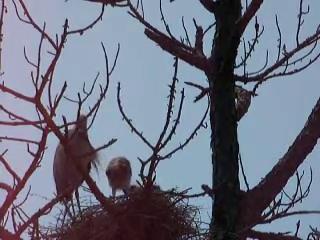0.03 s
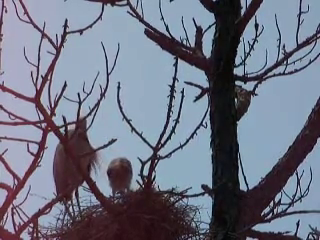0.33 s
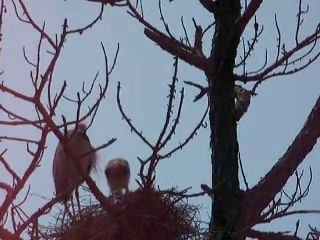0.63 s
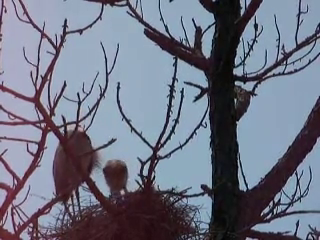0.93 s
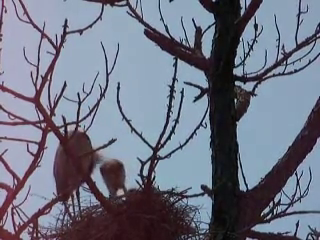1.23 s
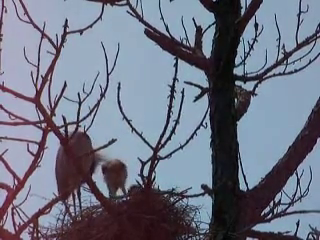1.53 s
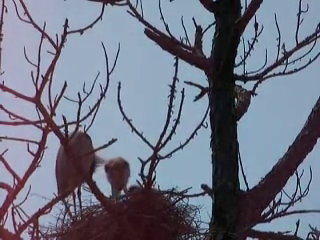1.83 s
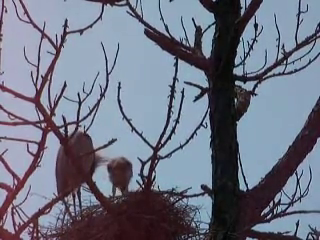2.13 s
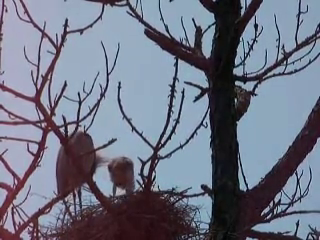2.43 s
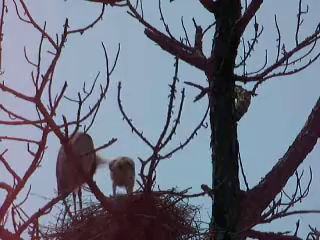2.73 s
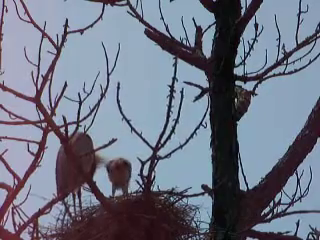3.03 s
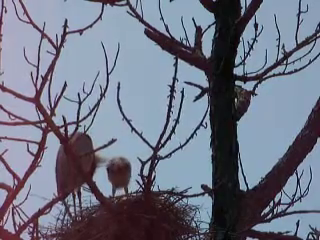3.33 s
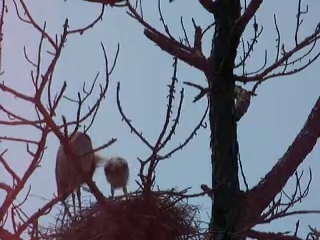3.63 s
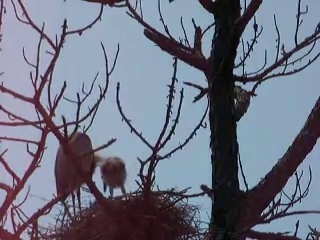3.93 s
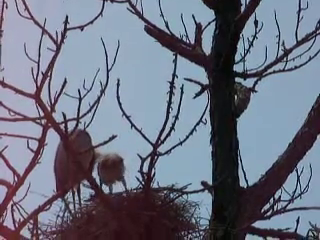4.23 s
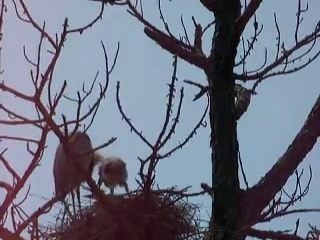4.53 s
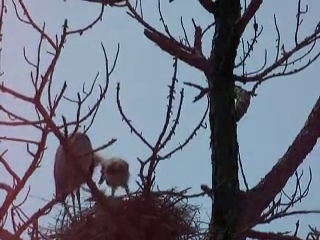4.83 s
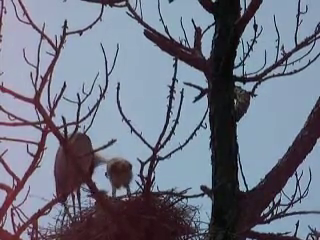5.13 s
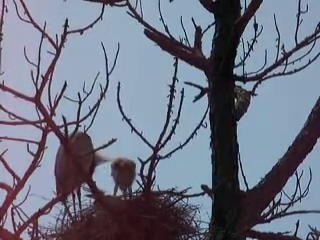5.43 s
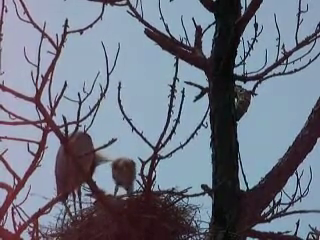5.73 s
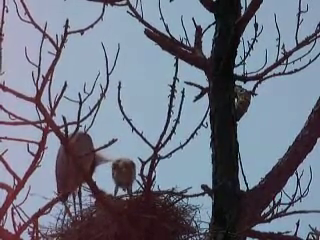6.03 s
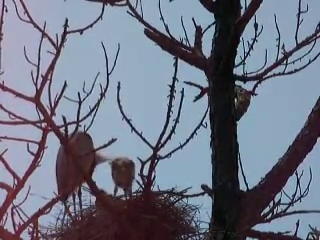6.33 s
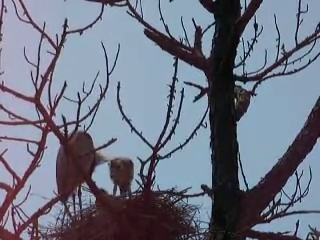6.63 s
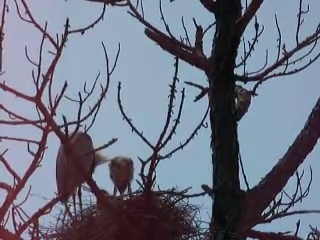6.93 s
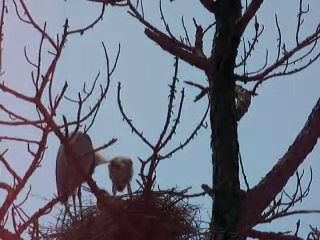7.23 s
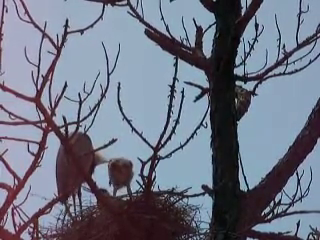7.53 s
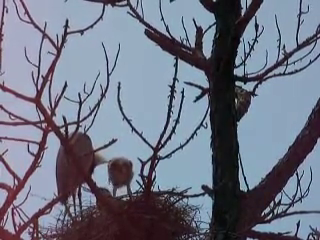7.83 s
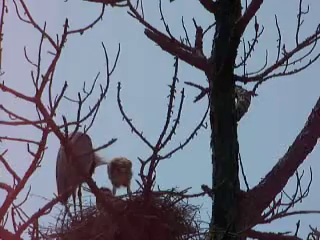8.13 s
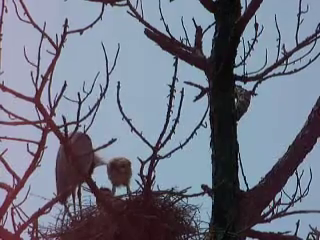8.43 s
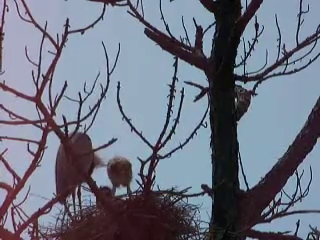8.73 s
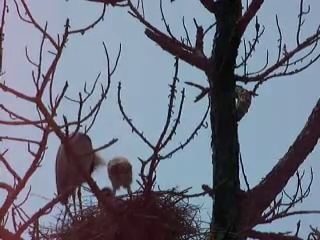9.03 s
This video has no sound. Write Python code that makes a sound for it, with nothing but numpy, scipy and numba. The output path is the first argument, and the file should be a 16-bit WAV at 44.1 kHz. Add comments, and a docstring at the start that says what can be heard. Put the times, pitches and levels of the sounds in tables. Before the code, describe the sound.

A heron chick begs in quick, dry clacking calls from its nest, over distant engine drone, traffic and faint rustling leaves.

```python
"""A heron chick begs from a nest high in a tree: dry "kek" calls, five or six a second, in bouts.
Each kek is a short, quickening run of pulses from its voice box (the syrinx). They make the throat
and open bill ring, then scatter off the twigs. Far engines drone, traffic washes by and leaves
rustle in the breeze. Nest sticks tick, wood knocks, and near the end another bird peeps faintly."""
import sys
import numpy as np
from scipy import signal
from scipy.fft import rfft, irfft, next_fast_len
from scipy.io import wavfile
from scipy.ndimage import map_coordinates
from numba import njit

SR = 44100
rng = np.random.default_rng(int(sys.argv[2]) if len(sys.argv) > 2 else 0)


def waveform_to_disk(signal):
    """Save audio, clipped to [-1, 1], as 16-bit WAV at the path in sys.argv[1]."""
    frames = np.transpose(np.atleast_2d(signal))
    scaled = np.clip(frames, -1, 1) * 32767
    samples = np.round(scaled).astype(np.int16)
    wavfile.write(sys.argv[1], SR, samples)


N = 405279
T = np.arange(N) / SR

# far engine notes: (pitch [Hz], level [dB], pitch change on pulling [Hz], level change on pulling [dB],
# pitch change on easing off [Hz], level change on easing off [dB])
ENGINE_NOTES = [(65.5, -22, 4, -0.7, -8.5, -11.5), (112, -28, -0.44, 4, -21.5, -15.5)]
# tone of the low rumble: (frequency [Hz], relative level [dB])
RUMBLE_TONE = [(15, -24), (28, -3.5), (44, 1), (58, 0.5), (90, 5), (135, -2), (175, -4.5), (240, -21),
               (400, -73.5)]
# how the steady engine swells and sinks: (time [s], level [dB])
STEADY_LEVEL = [(0, -30), (1.4, -22), (2.4, -27.5), (3.6, -25.5), (4.2, -35), (4.7, -24), (5.4, -32.5),
                (6.05, -23), (7.75, -31), (8.3, -20), (9.19, -30)]
# tone of the far road: (frequency [Hz], relative level [dB])
ROAD_TONE = [(120, -6), (250, -1.87), (400, -3), (580, -5), (830, -1.5), (1150, -7), (1600, -11.5),
             (2200, -18), (4000, -22.5), (8000, -66)]
# tone of the rustle, with the microphone's 5 kHz peak and fading treble:
# (frequency [Hz], relative level [dB])
RUSTLE_TONE = [(900, -27), (2000, -8.5), (3000, -9), (4200, -6), (4700, -4), (5100, 0.5), (5600, -6),
               (6200, -7), (7000, -15.5), (8000, -25.5), (8600, -57)]
# loudness of the leaf rustle, rising in gusts and dipping at times: (time [s], relative level [dB])
RUSTLE_LEVEL = [(0.0, -33), (1.0, -37.5), (1.07, -36.5), (2.3, -40.5), (3.04, -41), (3.3, -34), (4.02, -38),
                (4.27, -36.5), (5.71, -40), (5.94, -33.5), (6.55, -30.5), (6.68, -33.5), (6.91, -33),
                (7.22, -27.5), (7.5, -33.5), (8.27, -37), (9.19, -37.5)]
# the chick's calls: (time [s], length [s], relative level [dB])
KEKS = [(.117, 0.027, -22.5), (0.303, 0.028, -25.5), (0.484, 0.039, -24), (.679, 0.035, -25),
        (0.877, 0.048, -25.5), (1.065, 0.038, -19.5), (1.49, 0.038, -21.5), (1.636, 0.04, -19.5),
        (1.817, 0.037, -17), (1.991, 0.025, -16.5), (2.155, 0.035, -20.5), (2.334, 0.048, -20.5),
        (2.531, 0.035, -17.5), (2.733, .032, -22.5), (3.211, .039, -30), (3.377, 0.024, -23.5),
        (3.557, 0.033, -23), (3.74, 0.038, -25.5), (3.938, 0.032, -29), (4.119, 0.045, -25),
        (4.302, 0.042, -21.5), (4.494, 0.047, -25), (4.913, .033, -30.5), (5.066, 0.028, -22.5),
        (5.248, 0.033, -22), (5.429, 0.037, -17), (5.613, 0.037, -13), (5.79, 0.047, -17),
        (5.974, 0.05, -19), (6.169, 0.038, -20), (6.546, 0.024, -24.5), (6.695, 0.029, -16.5),
        (6.875, .031, -22.5), (7.058, 0.05, -22.5), (7.254, 0.027, -27.5), (7.435, 0.029, -27.5),
        (7.618, 0.034, -26.5), (7.816, .033, -26.5), (8.208, .032, -30), (8.366, 0.042, -23.5),
        (8.549, 0.052, -26), (8.736, 0.042, -25.5), (8.934, 0.033, -26), (9.138, 0.033, -28.5)]
# the throat tightens as the begging grows keen, then slackens:
# (time [s], lowest ringing pitch [Hz], its relative level [dB])
THROAT_TENSION = [(0, 1686, -3), (.9, 1698, -5), (1.6, 1741, -3), (2.2, 1911, -2.5), (3.5, 1921, -6.5),
                  (5.3, 1939, -6), (7.05, 1967, -6), (7.7, 1765, -6), (8.25, 1790, 3.5), (9.19, 1763, -1)]
# upper ringing bands of the call; the one near 5 kHz is the microphone's colour:
# (pitch [Hz], width [Hz], relative level [dB])
UPPER_RINGS = [(3012, 185, -3.5), (4060, 360, -7), (4853, 170, -4.5), (6230, 430, -9)]
# a wider bill sounds brighter: (time [s], treble against the lower part of the call [dB])
BILL_OPENING = [(0, -8), (1.05, -3), (1.5, 0), (1.85, 0.5), (2.3, -5), (5.5, -5), (6.7, -7), (7.8, -20),
                (9.19, -9)]
# sticks ticking in the nest: (time [s], relative peak level [dB], ringing pitch [Hz])
STICK_TICKS = [(3.106, -12, 5220), (3.681, -16.5, 2610), (4.8334, -17, 4900), (5.7264, -15, 5190),
               (5.7843, -21, 2400), (6.4068, -13.5, 5200), (6.4275, -12, 5150), (6.464, -10.5, 5050),
               (6.6095, -6, 4900), (7.1097, -11, 4830)]
# dull knocks on wood: (time [s], relative peak level [dB], ringing pitch [Hz])
WOOD_KNOCKS = [(4.9857, -16, 1110), (4.998, -26, 1310), (6.0942, -28, 1030), (6.4596, -21, 1120)]
# another bird: (time [s], length [s], start pitch [Hz], end pitch [Hz], relative level [dB])
PEEPS = [(7.722, 0.0083, 3400, 2810, -33.5), (8.27, 0.1, 3590, 4200, -36.5), (8.35, .09, 4120, 4480, -45.5)]
# how alike left and right are for sound from all around: (frequency [Hz], likeness [-1 to 1])
LIKENESS = [(25, .93), (70, 0.99), (130, 0.93), (280, 1), (530, 0.88), (950, 0.68), (1600, -0.021),
            (2700, -0.58), (4600, 0.15), (8000, 0.85)]
# the two microphone openings differ in level: (frequency [Hz], left minus right [dB])
MIC_BALANCE = [(30, -11.5), (70, -2), (120, -1), (250, -0.7), (950, 0.6), (1500, 2.5), (2000, -2.5),
               (2700, -4), (4700, -11.5), (6000, 3.5), (7500, 0)]
# they also differ in timing: (frequency [Hz], how far the left wave leads [radians])
MIC_LEAD = [(0, 0.066), (70, 0.76), (130, 0.32), (430, 0.22), (1100, 1.35), (2100, -0.7), (2900, 0.6),
            (4200, -0.41), (5400, 1.42), (8000, 1.9)]


def undb(db):
    """Turn decibels into a number to multiply a sound by."""
    return 10 ** (np.asarray(db) / 20)


def unit(x):
    """Scale a sound to an average strength (rms) of 1."""
    return x / np.sqrt(np.mean(x ** 2))


def curves(table):
    """Turn the columns of a table into curves over time, joined by straight lines."""
    times, *columns = np.transpose(table)
    return [np.interp(T, times, column) for column in columns]


def spectrum(table, f):
    """Look up a table at frequencies f, giving every octave equal room."""
    hz, value = np.transpose(table)
    return np.interp(np.log(f + 1), np.log(hz), value)


def resonance(f, hz, width):
    """How a ringing object answers each frequency: fully at hz, less to either side."""
    return 1j * f * width / (hz ** 2 - f ** 2 + 1j * f * width)


def filtered(x, response):
    """Reshape a sound: response(f) says how much of each frequency gets through."""
    size = next_fast_len(x.shape[-1], True)
    return irfft(rfft(x, size) * response(np.fft.rfftfreq(size, 1 / SR)), size)[..., :x.shape[-1]]


def wander(rate):
    """Drift at random, by about 1 either way, to a new value `rate` times a second."""
    return 1.2 * np.interp(T * rate, np.arange(2048), rng.standard_normal(2048))


def settle(start_s, time_s):
    """Move from 0 to 1, quickly at first, from a given moment on."""
    return 1 - np.exp(-np.maximum(T - start_s, 0) / time_s)


def swell(start_s, end_s, rise_db_per_s, fall_db_per_s):
    """A level in dB that rises, holds at 0 from start to end, and dies away."""
    return -rise_db_per_s * np.maximum(start_s - T, 0) - fall_db_per_s * np.maximum(T - end_s, 0)


def add(out, start_s, sound):
    """Mix a sound in at the given time."""
    i = int(start_s * SR)
    out[:, i:i + sound.shape[-1]] += sound[..., :N - i]


def all_around(noise, tone):
    """Give two noises a tone and share them between left and right, as if from all around."""
    shared = filtered(noise[0], lambda f: tone(f) * np.sqrt(1 + spectrum(LIKENESS, f)))
    opposed = filtered(noise[1], lambda f: tone(f) * np.sqrt(1 - spectrum(LIKENESS, f)))
    return unit(np.array([shared + opposed, shared - opposed]))


def wash(tone):
    """Smooth, steady noise from all around."""
    return all_around(rng.standard_normal((2, N)), tone)


def echoes(x, decay_s, db):
    """Many fading reflections of a sound, different on the left and right."""
    t = T[:SR // 2]
    tail = rng.standard_normal((2, len(t))) * np.exp(-t / decay_s)
    tail *= undb(db) / np.sqrt(np.sum(tail ** 2, axis=1, keepdims=True))
    return signal.fftconvolve(np.atleast_2d(x), tail, axes=1)[:, :x.shape[-1]]


def drone(hz, db, waver_db, waver_rate, drift):
    """A far engine note whose strength and timing waver on the way."""
    gain = undb(db + waver_db * np.tanh(wander(waver_rate)))
    phase = 2 * np.pi * np.cumsum(np.broadcast_to(hz, N)) / SR + drift * wander(waver_rate)
    return np.sqrt(2) * gain * np.sin(phase)


def passing_vehicle():
    """The rise and fall, in dB, of a vehicle that goes by at the start."""
    return swell(.15, .7, rise_db_per_s=20, fall_db_per_s=22)


def far_engines(boom_db=4., rumble_db=-24.):
    """Engines pull, then ease off, over a rumble; the lowest note booms as the vehicle goes by."""
    pull, ease = settle(start_s=1.554, time_s=.447), settle(start_s=5.14, time_s=.8)
    booms = (boom_db * undb(passing_vehicle()), 0)
    notes = 0
    for (hz, db, pull_hz, pull_db, ease_hz, ease_db), boom in zip(ENGINE_NOTES, booms):
        pitch = hz + pull_hz * pull + ease_hz * ease
        level = db + boom + pull_db * pull + ease_db * ease ** 2  # drops later than the pitch
        notes += drone(pitch, level, waver_db=2., waver_rate=7., drift=.15)
    return notes + undb(rumble_db) * wash(lambda f: undb(spectrum(RUMBLE_TONE, f)))


def steady_engine(hz=89.56):
    """An engine holds its pitch while it swells and sinks; a higher note slowly grows above it."""
    note = drone(hz, curves(STEADY_LEVEL)[0], waver_db=3., waver_rate=8.9, drift=.84)
    overtone = drone(1.5 * hz, db=-37.5 + .8 * T, waver_db=3., waver_rate=9., drift=1.2)
    return note + overtone


def rising_engine(start_hz=182.9, rise_hz=19., start_db=-31., fade_db=-10.5):
    """A higher engine speeds up and draws away."""
    pitch = start_hz + rise_hz * settle(start_s=0, time_s=1.4)
    level = start_db + fade_db * settle(start_s=1.3, time_s=1.)
    return drone(pitch, level, waver_db=3., waver_rate=8., drift=.8)


def traffic(road_db=-25.9, flutter_db=.5, roar_db=-24.5, whine_db=-32.5):
    """The wash of a far road, with the roar of the passing vehicle and a brief whine."""
    road = wash(lambda f: undb(spectrum(ROAD_TONE, f))) * undb(road_db + flutter_db * wander(9))
    roar = wash(lambda f: resonance(f, hz=542., width=440.) ** 2) * undb(roar_db + passing_vehicle())
    whine_level = whine_db + swell(1.19, 1.8, rise_db_per_s=100, fall_db_per_s=9)
    return road + roar + drone(hz=738., db=whine_level, waver_db=2.5, waver_rate=22., drift=.6)


def leaves(gain_db=5., crackle=.265, size_spread_db=5.5, flutter_db=1.47):
    """Leaves and twigs brush together: a hiss with tiny ringing clicks, thicker when it is louder."""
    rustle_db = curves(RUSTLE_LEVEL)[0]
    clicks_per_s = 200 * undb(rustle_db - rustle_db.mean())
    clicks = 0
    for hz in (2580., 3840., 4790., 5640., 6580.):
        hits = rng.random((2, N)) < clicks_per_s / SR
        sizes = undb(size_spread_db * np.minimum(rng.exponential(size=(2, N)), 5))
        clicks += filtered(hits * sizes, lambda f: resonance(f, hz, width=925.) ** 2)
    hiss = rng.standard_normal((2, N))
    rustle = all_around(hiss + crackle * unit(clicks), lambda f: undb(spectrum(RUSTLE_TONE, f)))
    return rustle * undb(rustle_db + gain_db + flutter_db * wander(16))


def voice_box(t, length, hz, quicken=1.8, swell_s=.013, fade_db=4.5, rasp=.075, rasp_s=.0013):
    """Pulses quicken and grow ragged, swell and fade; a puff of rasp follows each."""
    count = np.arange(16)
    time_chance, force_chance = np.clip(rng.standard_normal((2, len(count))), -2, 2)
    times = (np.sqrt(1 + 2 * quicken * count / hz) - 1) / quicken
    times += np.cumsum(.018 * time_chance * np.minimum(times / length, 1)) / hz
    force = np.minimum(.6 + .4 * times / swell_s, 1)
    force *= undb(1.5 * force_chance - fade_db * (times / length) ** 2)
    force *= np.clip(1 + (length - times) * hz, 0, 1) ** 2  # the pulses stop as the call ends
    since = t - times[:, None]
    clicks = force @ np.sinc(since * SR / 2) / 2
    puffs = force @ (np.exp(-np.abs(since) / rasp_s) * (since > 0))
    return clicks + rasp * puffs * rng.standard_normal(len(t))


def kek(length, pulse_hz, db, bright_db, low_hz, low_db, high_hz, treble_hz=3850.):
    """One call: pulses ring the throat and bill, and the nest scatters them to each side."""
    t = np.arange(4096) / SR
    # the throat tightens during the call, so pulse rate and ringing slide up together
    speed = 1 + 3 * np.minimum(t, length)
    mid_speed = np.interp(length / 2, t, speed)
    # it also trembles, so each pulse rings at a slightly different pitch
    speed += .03 * np.interp(t * pulse_hz, np.arange(32), rng.standard_normal(32))
    rings = [(low_hz, 220, low_db), (high_hz, 180, 0)]  # the throat; columns as in UPPER_RINGS
    rings += [(hz * (1 + .041 * rng.standard_normal()), width, level) for hz, width, level in UPPER_RINGS]

    def ringing(f):
        """Neighbouring bands add up with opposite signs, as at the mouth of a tube."""
        return sum((-1) ** k * undb(level) * resonance(f * mid_speed, hz, width)
                   for k, (hz, width, level) in enumerate(rings))
    voice = filtered(voice_box(t, length * mid_speed, pulse_hz), ringing)
    # a small throat gives out little below its lowest ring; the highest treble fades too
    band = np.array([.85 * low_hz, 5700]) / mid_speed
    voice = signal.sosfilt(signal.butter(5, band, "bandpass", fs=SR, output="sos"), voice)
    # the treble of each pulse comes a little late: a tiny upward chirp
    voice = filtered(voice, lambda f: np.exp(-1j * np.pi * 1.4e-7 * np.maximum(f - low_hz, 0) ** 2))
    voice = map_coordinates(voice, [np.cumsum(speed)], order=3)  # play it at the changing speed
    voice = voice + echoes(voice, decay_s=.0055, db=-6.)
    # the opening bill lifts the treble
    body = filtered(voice, lambda f: 1 / (1 + (f / treble_hz) ** 20))
    opening = np.minimum(.73 + t / length, 1)
    treble = undb(bright_db) * unit(opening * (voice - body))
    return (unit(body) + treble) * undb(db) * np.sqrt(length / t[-1])


def chick(gain_db=.5, usual_db=-23, usual_low_hz=1850, usual_high_hz=2434, usual_pulse_hz=195):
    """Bouts of keks shaped by force, throat tension and bill opening, with a short echo from trees."""
    out = np.zeros((2, N))
    throat_hz, throat_db = curves(THROAT_TENSION)
    bright_db = curves(BILL_OPENING)[0]
    for (start_s, length, db), chance in zip(KEKS, rng.standard_normal((len(KEKS), 3))):
        i = int(start_s * SR)
        tension = throat_hz[i] / usual_low_hz - 1
        # more force and a tighter throat both speed up the pulses
        pulse_hz = (usual_pulse_hz + .86 * (db - usual_db)) * (1 + .5 * tension + .025 * chance[0])
        low_hz = throat_hz[i] * (1 + .0097 * chance[1])
        high_hz = usual_high_hz * (1 + .25 * tension + .0097 * chance[2])
        add(out, start_s, kek(length, pulse_hz, db, bright_db[i], low_hz, throat_db[i], high_hz))
    return undb(gain_db) * (out + echoes(out, decay_s=.026, db=-8.))


def wood_taps(table, decay_s, width_hz, gain_db):
    """Short cracks, each making the wood ring loosely around one pitch."""
    out, t = np.zeros((2, N)), T[:SR // 20]
    for start_s, db, hz in table:
        burst = rng.standard_normal((2, len(t))) * np.exp(-t / decay_s)
        crack = all_around(burst, lambda f: resonance(f, hz, width_hz) ** 2)
        add(out, start_s, crack * undb(db + gain_db) / np.abs(crack).max())
    return out


def other_bird(hoarse_hz=1200.):
    """Thin, hoarse, gliding peeps, heard as they bounce off the branches."""
    out = np.zeros((2, N))
    for start_s, length, start_hz, end_hz, db in PEEPS:
        n = int(length * SR)
        hz = np.linspace(start_hz, end_hz, n) + hoarse_hz * rng.standard_normal(n)
        peep = np.hanning(n) * np.sin(2 * np.pi * np.cumsum(hz) / SR)
        add(out, start_s, undb(db) * unit(peep))
    return echoes(out, decay_s=.0066, db=3)


def microphone(f):
    """The two openings take in each frequency with unequal level and timing."""
    gains = undb(np.outer([.5, -.5], spectrum(MIC_BALANCE, f)))
    lead = np.outer([.5, -.5], np.interp(f, *np.transpose(MIC_LEAD)))
    return gains / np.sqrt(np.mean(gains ** 2, axis=0)) * np.exp(1j * lead)


@njit
def follow_peaks(x, rise_s, fall_s):
    """Follow a level: quickly up, slowly down."""
    out, level = np.empty(len(x)), 0.
    for i in range(len(x)):
        level += (x[i] - level) / (SR * (rise_s if x[i] > level else fall_s))
        out[i] = level
    return out


def scene():
    """The chick and its nest in front of leaves, road and engines."""
    sticks = wood_taps(STICK_TICKS, decay_s=.002, width_hz=1400., gain_db=2.5)
    knocks = wood_taps(WOOD_KNOCKS, decay_s=.007, width_hz=600., gain_db=7.)
    tree = leaves() + chick() + sticks + knocks + other_bird()
    return tree + traffic() + far_engines() + steady_engine() + rising_engine()


def record(dry, limit_db=-3.5, top_hz=8400):
    """The microphone colours the sound; loud peaks are turned down and clipped, and high treble is cut."""
    x = filtered(dry, microphone)
    excess = np.maximum(np.abs(x).max(axis=0) / undb(limit_db) - 1, 0)
    x = x / (1 + follow_peaks(excess, .002, .29))
    treble_cut = signal.ellip(8, .2, 70, top_hz, fs=SR, output="sos")
    return signal.sosfilt(treble_cut, np.clip(x, -1, 1))


dry = scene()
out = record(dry)
waveform_to_disk(out)
```